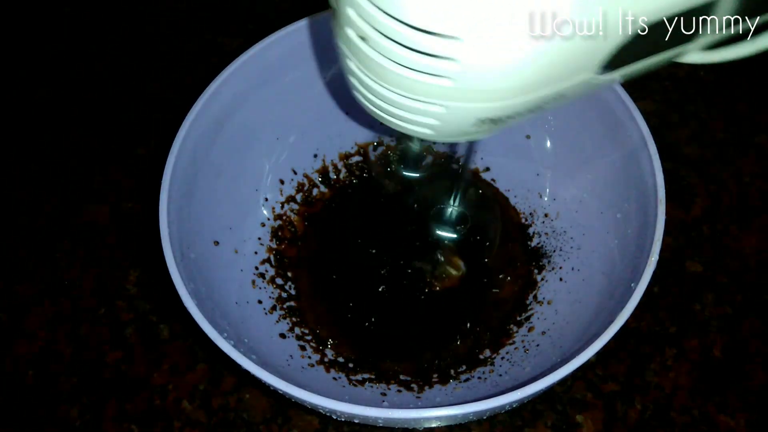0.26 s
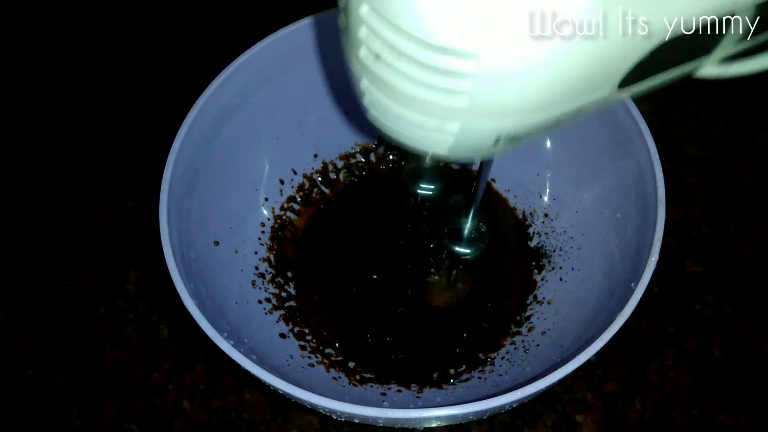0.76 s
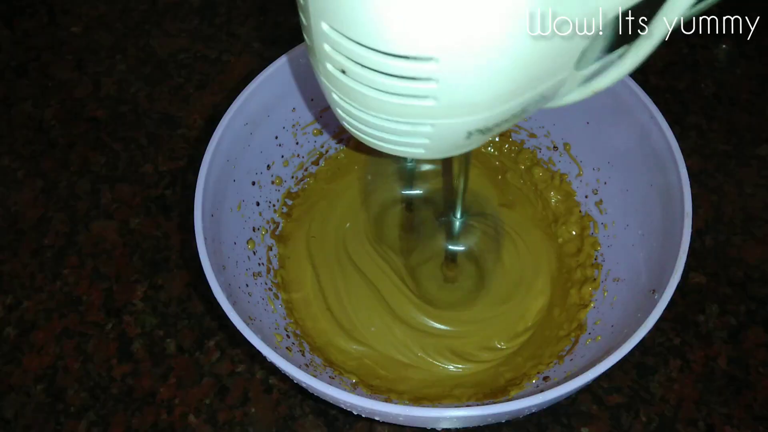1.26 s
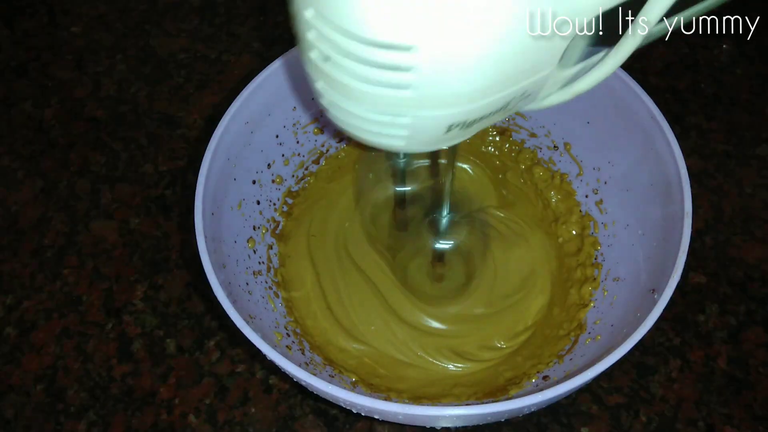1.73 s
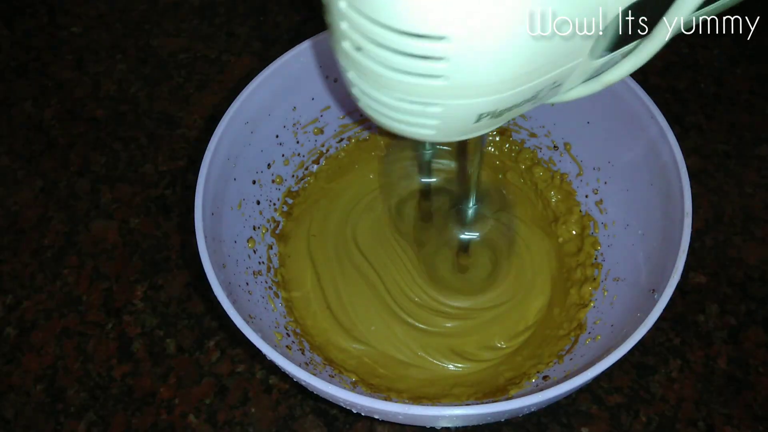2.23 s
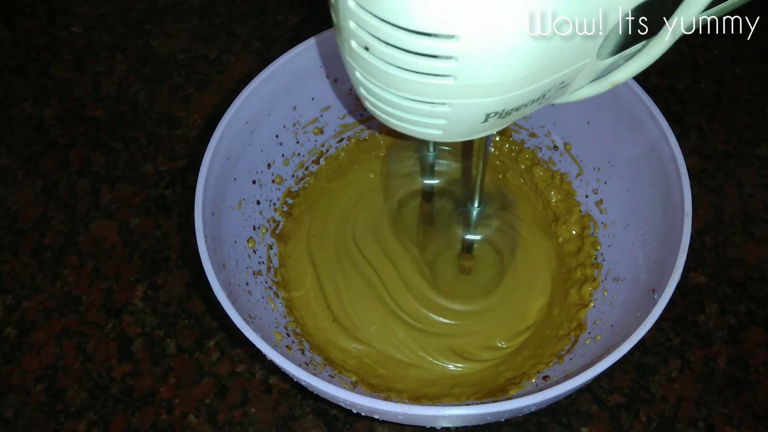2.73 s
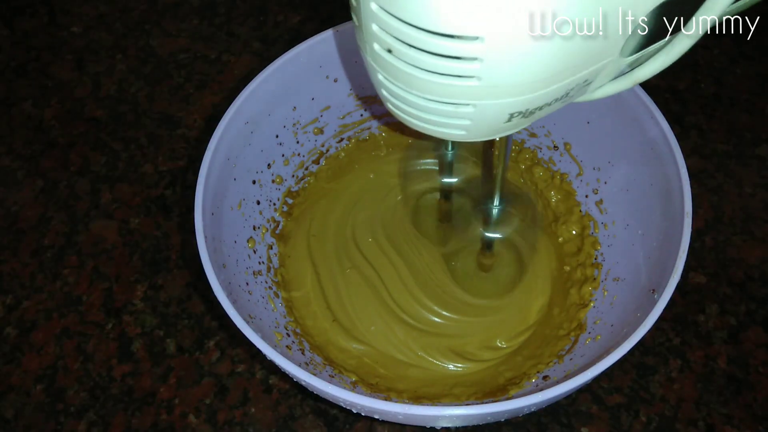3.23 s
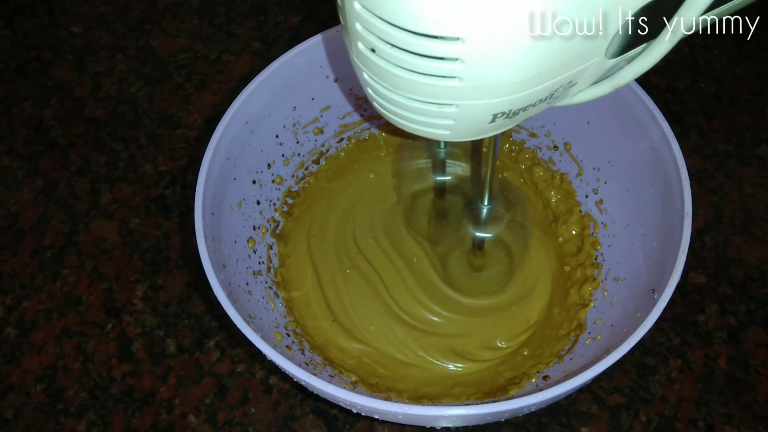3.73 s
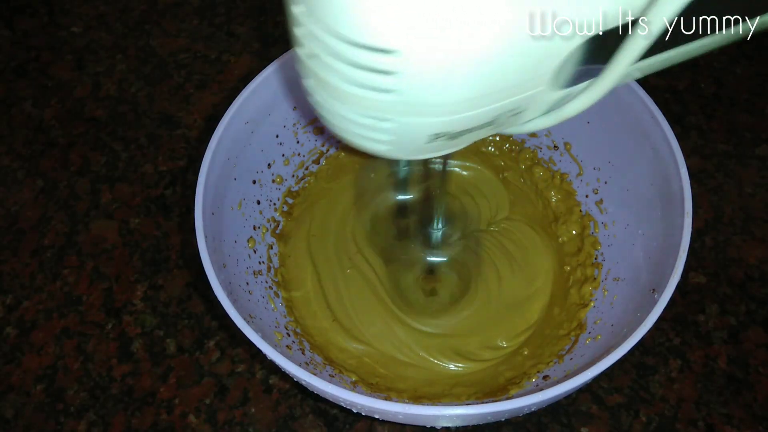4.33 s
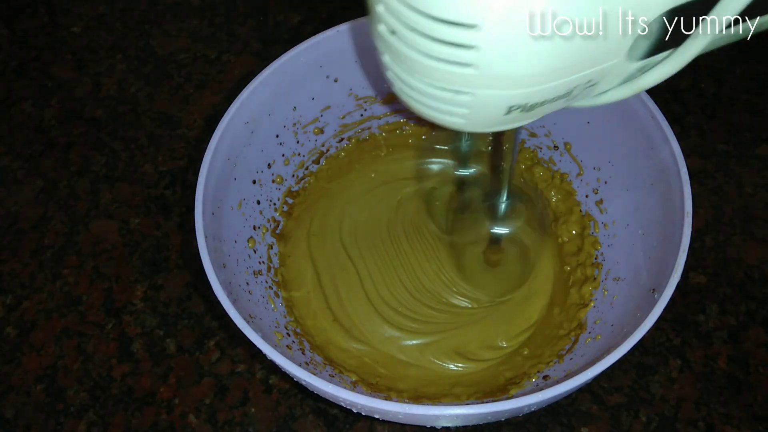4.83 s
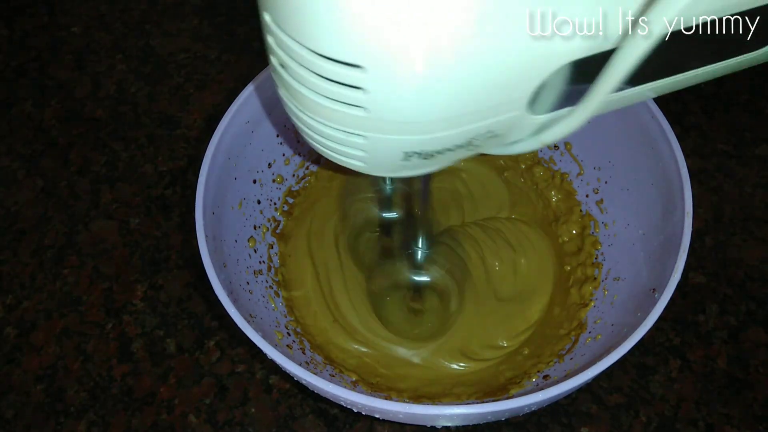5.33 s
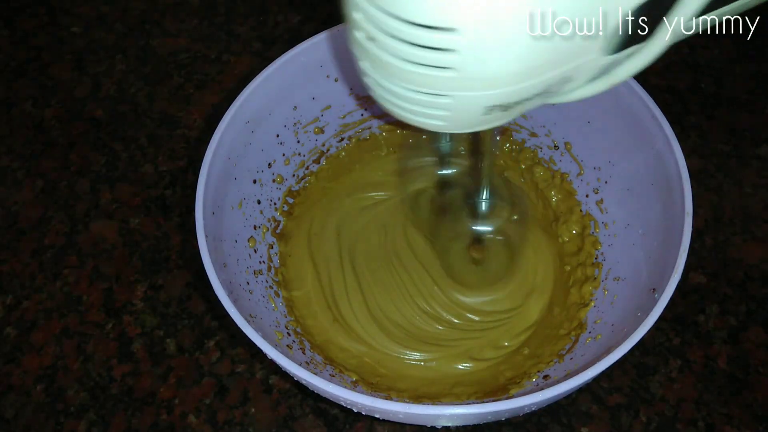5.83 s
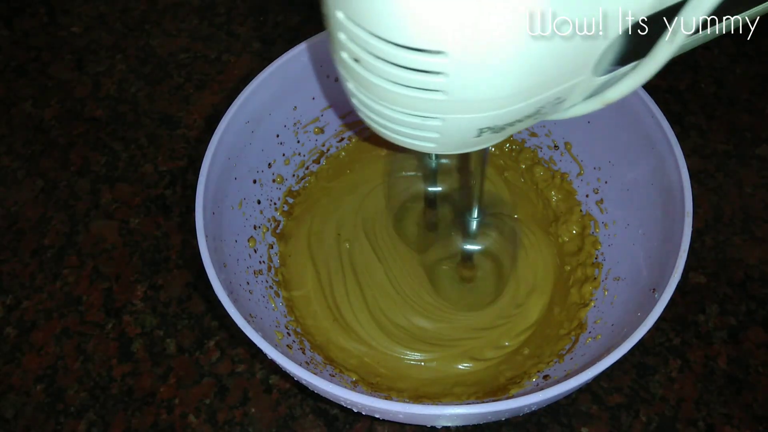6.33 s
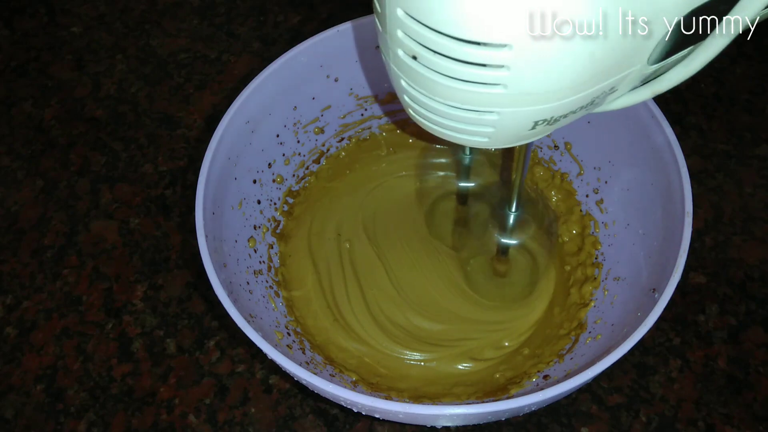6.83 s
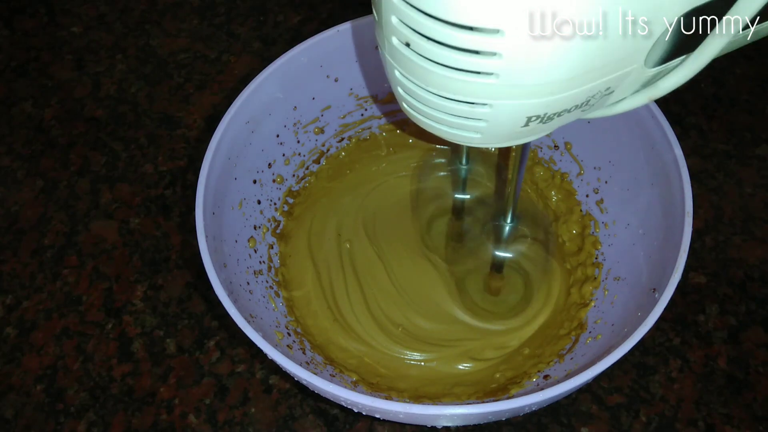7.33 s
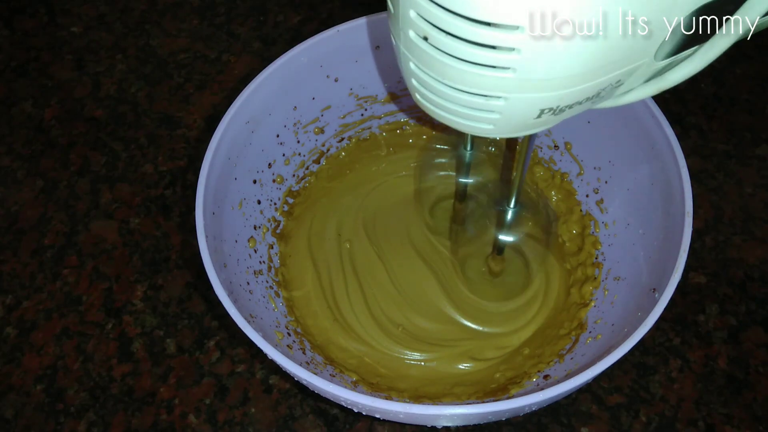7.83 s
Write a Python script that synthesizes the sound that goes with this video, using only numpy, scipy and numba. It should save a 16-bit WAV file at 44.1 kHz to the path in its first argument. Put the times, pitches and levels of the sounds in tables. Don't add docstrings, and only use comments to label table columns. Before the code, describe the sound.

A hand mixer is heard near the microphone. First a slow, rough whir with busy, uneven plastic knocks and wire ticks, cut off sharply. After a brief near silence, a smoother, brighter full-speed whine swells in, with airy hiss and soft churning in thick foam, wavering slightly. Finally a soft switch thud; the motor drops in pitch and flutters as room hush rises.

```python
import sys
import numpy as np
from scipy import signal
from scipy.fft import rfft, irfft, next_fast_len
from scipy.io import wavfile
from scipy.ndimage import uniform_filter1d
from numba import njit

SR = 44100
rng = np.random.default_rng(int(sys.argv[2]) if len(sys.argv) > 2 else 0)


def makeup_ratio(level_db):
    decades = np.asarray(level_db, float) / 20
    return 10 ** decades


def generate_wav(sig):
    pcm = np.round(np.clip(np.atleast_2d(sig).T, -1, 1) * 32767).astype(np.int16)
    wavfile.write(sys.argv[1], SR, pcm)


N = 355870
TIME = np.arange(N) / SR

# start_s, shaft_hz, lean (-2..2), twist (-2..2)
SLOW_RUN = [
    (0, 271.7, 0.05, -0.65),
    (.2, 272.1, -0.02, 0.97),
    (.6, 273.4, 0.15, -0.13),
    (.8, 274, 0.18, 0.24),
    (1.0, 275.5, -0.88, -1),
    (1.06, 274.7, 0.97, 1),
    (1.12, 277.7, 0.89, 0.5),
]
FAST_RUN = [(1.5, 429, -1.7, -0.9), (2.0, 429, -0.21, 2), (2.3, 428, -1.2, -2), (2.7, 428.8, -1.1, -2),
            (3.1, 429.2, -1.7, -2), (3.6, 430.3, -0.11, -1.1), (4.0, 428.6, -1.18, -2),
            (4.33, 430.6, -1.1, -1.5), (4.5, 428.5, 0.24, 0.5), (4.9, 426.4, 0.56, -1.8),
            (5.4, 428, 1.7, 0.5), (5.7, 427, 0.95, -0.5), (6.0, 424.8, 1.7, -1), (6.4, 427.3, -1, -0.5),
            (6.88, 429.7, -1, -1.3), (7.1, 423.4, 0.5, -1), (7.22, 417.5, 0.54, -1), (7.32, 412, 0.96, 0.3)]
# shaft_multiple, left_db, right_db, left_lead_rad, gear_wobble_depth (0-1)
SLOW_TONES = [(1.004, 3, 0, -0.5, 0), (5.94, -7.5, 1, -0.5, 0.8), (7.22, 0, -6, -4.5, 0.2),
              (2.85, 1.5, -2, -2.5, 0.15), (8.04, -9, 0.5, -1.5, 0.1), (11.5, -2.5, -12, 1.3, 0.7),
              (16, -20, -11, 0, 0.6), (24, -20, -9, 5.5, 0.5), (15, -16, -15, -0.5, .5),
              (17, -17, -11, 2, .5), (20, -16, -20, 1.5, .5), (35.5, -20, -2, -1, 1.2),
              (38, -24, -21, -7, .2)]
FAST_TONES = [(1.0008, 4, -4, 0.28, 0.21), (3, -4.5, 4, 1, 0.46), (4, 1.5, -3, 1, 0.47),
              (1.994, 1.5, 4, -2, 0.24), (7.008, 5, -1, 0.5, 0.47), (5.015, 5, -2, 1, 0.36),
              (8, 1, 0.5, 2, 0.34), (5.974, -13.5, -13.5, 0, 0.14), (9, -15.5, -15.5, 6, 0.23),
              (10, -23, -17, 2.5, 0.18), (13, -24, -24, 1.5, .2), (16, -16, -18, 2, 0.22),
              (11.1, -16.5, -23, 1, 0.17), (12, -12, -11, 2, 0.23), (13.9, -16, -15, 1.5, 0.25),
              (18.2, -9, -14, 1.5, 0.34), (24, -14, -6, 4.5, 0.22)]
# level_db, per_lean_db, per_twist_db, coasting_loss_db
SLOW_PARTS = [
    (-50.5, 3, -1, -3),
    (-52.5, 10, -8.5, -1),
    (-52.5, 2.5, 1, -1),
    (-51, 1.5, 1, -2),
    (-54, 0, 4, 1),
]
FAST_PARTS = [
    (-43, 0.07, -0.063, 39),
    (-53.5, 0.2, 0.077, 5),
    (-43.5, -0.5, 0, 10.8),
    (-42.5, 1, -1.2, 27),
    (-45.5, 1, -0.34, 35),
    (-41.5, -1.6, 0.21, 32),
    (-55, 3, -0.086, 21),
    (-52, -2.5, 0, 40),
    (-52, 0.5, 1.5, 23),
    (-52, 4, -2.3, 11),
]
# start_s, roll (-2..2)
WRIST_ROLL = [(1.2, 0.29), (2.0, 0.38), (2.8, -0.52), (3.6, -0.64), (4.3, -0.93), (4.8, 0.022),
              (5.12, -0.49), (5.5, -0.61), (5.85, -0.16), (6.3, -0.31), (6.8, -1.2), (7.1, -0.095),
              (7.4, 1.5)]
PART_ROLL_DB = [0.15, 0.1, 0.1, 0.092, 2.4, 0.069, 0.1, 0.1, 0.1, 0.1]
# pitch_hz, width_hz, lift_db
HOUSING_MODES = [(361, 16.6, 4.5), (418.3, 5.3, -13.5), (833, 12.6, 8.5), (1259.5, 13.5, 6.5),
                 (1550, 37, 6), (1679, 16, 5), (1904, 33, 13), (2265, 53, 5), (2600, 108, 15.5),
                 (2770, 21, 6.5), (2945, 47, -6.5), (3170, 18, 9)]
# centre_s, dip_db, half_length_s
FOAM_CATCHES = [(7.173, 1, 0.026), (7.388, -11, 0.018), (7.445, -12, 0.0088), (7.49, -14, 0.011),
                (7.569, -13, 0.011), (7.614, -12.5, 0.0089), (7.702, -6, 0.015), (7.769, -6, 0.02),
                (7.809, -6, 0.011), (7.927, -4, 0.011), (8.04, -14, 0.015)]
# frequency_hz, density_db (per Hz)
SLOW_AIR = [(18, -76), (45, -49), (90, -31), (221, -21), (273, -9), (336, -6.5), (461, -10), (569, -9),
            (1160, -16.5), (1670, -12), (2900, -15.5), (3980, -25), (8300, -28.5), (10800, -18.5),
            (16000, -31.5)]
FAST_AIR = [(18, -46), (40, -27), (70, -23.5), (140, -29), (364, -10.5), (1010, -14.5), (1720, -10.5),
            (2300, -12.5), (3450, -11), (3950, -25.5), (7000, -23), (8300, -23), (9500, -12.5),
            (11100, -10.5), (13300, -17), (14000, -23), (15000, -20), (16000, -19.5)]
# frequency_hz, density_db (per Hz)
RATTLE_SPECTRUM = [(300, -46), (1000, -4), (1800, -1), (3500, -1.5), (4500, -1), (6000, -3), (8000, -1.5),
                   (11000, -3.5), (13500, -7), (16000, -8)]
# pitch_hz, level_db, t60_s
BOWL_MODES = [(198.5, -6, 0.09), (363, -5.5, 0.069), (500, -6, 0.15), (580, -1.5, 0.2), (730, 3, 0.028),
              (852, 1.5, 0.046), (1000, -0.5, 0.03)]
WIRE_MODES = [(1880, -8, 0.019), (2260, -2, 0.02), (2930, 2.5, 0.027), (3300, -20, 0.026),
              (4820, -6.5, 0.058), (7560, -23, 0.015), (10900, 3, 0.011)]
# start_s, peak_db, spot_pitch_hz
KNOCKS = [(0.012, -32, 715), (0.063, -32, 685), (0.074, -38, 547), (0.198, -33.5, 760), (0.256, -45, 690),
          (0.488, -37, 700), (0.189, -36, 855), (0.213, -33, 1000), (0.225, -31, 810), (0.246, -29.5, 750),
          (0.331, -29, 760), (0.404, -27, 744), (0.428, -27.5, 735), (0.448, -30, 466), (0.474, -29.5, 460),
          (0.594, -24.5, 720), (0.605, -32, 540), (0.679, -29, 495), (0.71, -27, 564), (0.736, -32, 471),
          (0.84, -29, 554), (0.866, -31, 570), (0.939, -32, 753.5), (1.036, -32, 766), (1.038, -30, 654),
          (1.052, -28, 700), (1.059, -31, 500), (1.096, -32, 510), (1.107, -36, 610), (1.101, -37, 710),
          (1.116, -30.5, 903), (1.179, -24.5, 631), (0.585, -31, 490), (0.045, -33, 520), (0.155, -44, 525),
          (0.336, -35, 720), (0.409, -36, 700), (0.465, -35, 614), (0.523, -36, 620), (0.108, -41, 560),
          (0.536, -41, 500), (0.689, -30, 604), (0.804, -37, 880), (0.845, -34, 530), (0.768, -37, 500),
          (1.040, -34, 500), (1.127, -36, 604), (1.136, -37, 587), (7.311, -37, 571.5), (7.409, -42, 595),
          (7.5, -46, 580), (7.63, -40, 580), (7.71, -45, 568)]
# start_s, ring_db, wire_pitch_hz
CLINKS = [(0.061, -48, 2130), (0.085, -41, 2200), (0.463, -41, 1890), (0.796, -43, 1588),
          (0.225, -41, 2130), (0.245, -38, 1800), (0.404, -38, 2230), (0.428, -41, 2060),
          (0.473, -36, 2330), (0.592, -41, 2600), (0.605, -38, 2200), (0.680, -34.5, 1760),
          (0.711, -40, 1730), (0.762, -40, 2600), (0.84, -45, 2070), (1.035, -28.5, 2430),
          (1.038, -31, 2600), (1.053, -30.5, 1890), (1.055, -37, 2200), (1.062, -42, 2200),
          (1.095, -36, 2170), (1.117, -47, 2130), (1.178, -38, 2194), (1.058, -38, 5600),
          (1.066, -42, 4900), (0.689, -40, 1700), (0.805, -40, 1700), (0.729, -39, 2200),
          (1.103, -40, 2000), (1.136, -47, 2100)]
# frequency_hz, density_db (per Hz)
CRACK_SPECTRUM = [(300, -19), (2500, 6.5), (5500, -2), (7000, -8), (11000, -4), (13000, -7), (16000, -6.5)]
# start_s, level_db, decay_s
BUMPS = [
    (0.98, -66, 0.05),
    (1.036, -58, 0.05),
    (0.46, -61, 0.06),
    (7.4, -69, 0.05),
    (7.9, -72, 0.061),
]
# frequency_hz, density_db (per Hz)
KITCHEN_SPECTRUM = [(18, -43), (100, -35), (260, -11), (890, -16), (1600, -11), (3000, -20), (4200, -19.5),
                    (6500, -23.5), (11000, -49), (14000, -28), (16000, -25.5)]
# start_s, level_db
KITCHEN_LEVEL = [
    (0, -63),
    (1.19, -59),
    (1.3, -67.5),
    (7.3, -50.5),
    (7.6, -47),
    (7.85, -49),
    (8.07, -50.5),
]
# pitch_hz, level_db, t60_s
HOLLOW_MODES = [(588, 0.5, 0.044), (766, -10.5, 0.1), (1620, 2, 0.08), (1750, -2, 0.08), (2230, 2, 0.072),
                (2470, -4, 0.074)]
# frequency_hz, common_share (0-1)
PORT_LIKENESS = [(30, .15), (70, 0.29), (140, 0.61), (350, 0.85), (700, 0.18), (2500, 0.42), (8000, 0.21),
                 (16000, 0.26)]
# frequency_hz, left_minus_right_db
PORT_TILT = [(30, -3), (300, 3.5), (2500, -0.5), (5000, -2.5), (9000, -2.5), (14000, -1)]

GEAR_RATIO = 21.45
SWITCH_OFF_S = 7.32
COAST_S, UNLOCK = 1.5, 0.2
CUT_S, FADE_FROM_S, FADE_TO_S = 1.188, 1.2676, 1.495
PORT_LAG_S, LAG_TOP_TURNS = 5 / SR, 1.19
PORTS_APART_HZ = 720


def mixer(run, parts, tones, air, wobbles, air_db, rattle_db, feedback, slosh_db, sputter_db, bursts_db):
    hz, (fan_db, bowl_db, other_db, *leading_dbs) = handling(run, parts, tones)
    whine = housing(hz, tones, leading_dbs + [other_db], wobbles, wander_db=2.0, quiver=0.41, dulling_db=3.0)
    turns = np.cumsum(hz) / SR
    beat = makeup_ratio(0.63 * np.cos(2 * np.pi * wobbles * turns / GEAR_RATIO) + 1.3 * walk(24.99))

    wind = patchy(ports(rng.standard_normal((3, N)), air), depth_db=2.5, wide_hz=259, long_s=0.07)
    gusts_db = 1.1 * walk(12) + 0.55 * walk(3.9) + 0.94 * np.cos(2 * np.pi * turns)
    wind *= makeup_ratio(fan_db + air_db + gusts_db)

    repeat = feedback * (hz / hz.max()) ** 4
    clatter = [once_a_turn(once_a_turn(x, hz, repeat), hz, repeat) for x in rng.standard_normal((3, N))]
    rattle = ports(np.array(clatter), RATTLE_SPECTRUM) * beat
    rattle *= makeup_ratio(fan_db + rattle_db + 0.49 * walk(3.58))

    slaps = rng.standard_normal(N) * (rng.random(N) < .02) * beat * makeup_ratio(bursts_db * walk(70))
    slosh = level(ring(slaps, BOWL_MODES, spread=1.0), 0) * makeup_ratio(bowl_db + slosh_db)
    ticks = rng.standard_normal(N) * (rng.random(N) < .003) * makeup_ratio(5 * walk(19))
    sputter = level(ring(ticks, WIRE_MODES, spread=1.7), 0) * makeup_ratio(bowl_db + sputter_db)
    return whine + wind + rattle + slosh + sputter


def handling(run, parts, tones):
    s, *columns = np.transpose(run)
    hz, lean, twist = (np.interp(TIME, s, c) for c in columns)
    hz = hz * np.exp(-np.maximum(TIME - SWITCH_OFF_S, 0) / COAST_S)
    slowing = np.log(hz.max() / hz)
    unlocked = 1 - np.exp(-(slowing / UNLOCK) ** 3) + 3 * slowing ** 2
    roll = np.interp(TIME, *np.transpose(WRIST_ROLL))
    dbs = []
    for row, (db, per_lean, per_twist, lost) in enumerate(parts):
        loss = slowing if row in (0, 2, 3) else unlocked
        dbs.append(db + per_lean * lean + per_twist * twist - lost * loss + PART_ROLL_DB[row] * roll)
    for db, (order, *_) in zip(dbs[3:], tones):
        for at_hz, width, lift_db in HOUSING_MODES:
            db += lift_db / (1 + ((round(order) * hz - at_hz) / width) ** 2)
    return hz, dbs


def housing(hz, tones, tone_dbs, wobbles, wander_db, quiver, dulling_db):
    out, turns = 0, np.cumsum(hz) / SR
    slowing = np.log(hz.max() / hz)
    choke_db = sum(db * np.exp(-((TIME - s) / half) ** 2) for s, db, half in FOAM_CATCHES)
    for row, (order, left_db, right_db, lead, depth) in enumerate(tones):
        free = row >= len(tone_dbs) - 1
        upper = row > 0
        unsteady = quiver * (1 + 0.07 * free * order + 9 * slowing * upper)
        gear = 2 * np.pi * (wobbles * turns / GEAR_RATIO + rng.random())
        swing = 1 + 0.56 * depth * np.cos(gear)
        drift_db = wander_db * free * walk(2.53) + (wander_db / 2 + 8 * slowing * upper) * walk(30)
        drift_db = drift_db + (not upper) * choke_db + 22 * np.minimum(slowing, .2) * upper * walk(18)
        drift_db = drift_db - dulling_db * free * order * slowing
        phase = 2 * np.pi * round(order) * turns + 0.8
        phase = phase + depth * np.cos(gear + 1.3 * (4 - round(order))) + unsteady * walk(40)
        left = makeup_ratio(left_db) * np.cos(phase + lead / 2)
        right = makeup_ratio(right_db) * np.cos(phase - lead / 2)
        tone_db = tone_dbs[-1 if free else row] + drift_db
        out = out + np.sqrt(2) * makeup_ratio(tone_db) * swing * np.array([left, right])
    return out


def patchy(x, depth_db, wide_hz, long_s):
    hz, _, cells = signal.stft(x, SR, nperseg=512)
    chance = rng.standard_normal(cells.shape[1:])
    for reach, axis in ((wide_hz * 512 / SR, 0), (long_s * SR / 256, 1)):
        size = max(int(reach), 1)
        chance = uniform_filter1d(uniform_filter1d(chance, size, axis), size, axis)
    depth_db = depth_db * np.clip(hz / 3200, 0, 1)[:, None] ** 2
    cells = cells * makeup_ratio(depth_db * chance / chance.std())
    return level(signal.istft(cells, SR, nperseg=512)[1][:, :N], 0)


@njit
def once_a_turn(x, hz, feedback):
    y = np.zeros(len(x))
    for i in range(len(x)):
        place = i - SR / hz[i]
        j = int(place)
        past = y[j] + (place - j) * (y[j + 1] - y[j]) if place > 0 else 0.
        y[i] = x[i] + feedback[i] * past
    return y


def ring(push, modes, spread):
    t = TIME[:SR // 5]
    apart = np.minimum(np.array(modes)[:, :1, None] / PORTS_APART_HZ, 1) ** 2
    turn = spread * rng.standard_normal((len(modes), 2, 1)) * apart
    response = 0
    for (hz, db, t60), angle in zip(modes, turn):
        response = response + makeup_ratio(db - 60 * t / t60) * np.sin(2 * np.pi * hz * t + angle)
    response = signal.sosfilt(signal.butter(2, 205, "high", fs=SR, output="sos"), response)
    return signal.fftconvolve(push[None], response, axes=1)[:, :N]


def knocks(spot_db, spot_t60, wire_db, wire_t60, bowl_db, whisk_db, crack_db, scatter_s):
    (s, peak_db, _), (clink_s, ring_db, _) = np.transpose(KNOCKS), np.transpose(CLINKS)
    dull, bright = np.zeros((2, N))
    dull[(s * SR).astype(int)] = makeup_ratio(peak_db + bowl_db)
    bright[(clink_s * SR).astype(int)] = makeup_ratio(ring_db)
    scrape = np.exp(-TIME[:600] / scatter_s)
    dull, bright = (signal.fftconvolve(x, scrape)[:N] for x in (dull, bright))
    grit = np.sign(rng.standard_normal((4, N)))
    out = ring(dull * grit[0], BOWL_MODES, spread=0.84)
    out += makeup_ratio(whisk_db) * ring(bright * grit[1], WIRE_MODES, spread=0.96)
    splash = signal.lfilter([.004], [1, -np.exp(-1 / (0.0094 * SR))], bright)
    crack = (bright + splash) * grit[2:]
    out += makeup_ratio(crack_db) * ports(np.vstack([crack[:1], crack]), CRACK_SPECTRUM) * np.std(crack)

    t = TIME[:SR // 12]
    late = t - np.array([[PORT_LAG_S], [0]])
    onset = np.minimum(t / 0.0016, 1)
    for start, db, hz in KNOCKS:
        spot = makeup_ratio(db + spot_db - 60 * t / spot_t60) * np.sin(2 * np.pi * hz * late) * onset
        out[:, int(start * SR):][:, :len(t)] += spot
    for start, db, hz in CLINKS:
        wire = makeup_ratio(db + wire_db - 60 * t / wire_t60) * np.sin(2 * np.pi * hz * late)
        out[:, int(start * SR):][:, :len(t)] += wire
    return out


def switch():
    since = np.maximum(TIME - SWITCH_OFF_S, 0)
    thud = uniform_filter1d(rng.standard_normal((2, N)), size=24, axis=1)
    return makeup_ratio(-31) * (since > 0) * np.exp(-since / 0.0081) * thud


def counter():
    band = signal.butter(2, [45, 110], "band", fs=SR, output="sos")
    rumble = signal.sosfilt(band, rng.standard_normal((2, N)))
    shape = sum(makeup_ratio(db) * (TIME > s) * np.exp(-np.maximum(TIME - s, 0) / decay) for s, db, decay in BUMPS)
    return level(0.3 * rumble[0] + rumble, 0) * shape


def mains_hum():
    return makeup_ratio(-58.5) * np.sin(2 * np.pi * 200 * TIME) + makeup_ratio(-71.5) * np.sin(2 * np.pi * 100 * TIME)


def kitchen():
    hush = ports(rng.standard_normal((3, N)), KITCHEN_SPECTRUM)
    drive = rng.standard_normal(N) * makeup_ratio(2.3 * walk(8.1))
    hollows = level(ring(drive, HOLLOW_MODES, spread=0.79), -4.5)
    return makeup_ratio(np.interp(TIME, *np.transpose(KITCHEN_LEVEL))) * (hush + hollows)


def ports(sources, spectrum):
    size = next_fast_len(N)
    shared, left, right = rfft(sources, size) * makeup_ratio(along(spectrum))
    like = np.clip(along(PORT_LIKENESS), 0, 1)
    lag_turns = np.minimum(np.fft.rfftfreq(size, 1 / SR) * PORT_LAG_S, LAG_TOP_TURNS)
    late = np.exp(-2j * np.pi * lag_turns)
    pair = np.sqrt(like) * shared * np.array([late, np.ones_like(late)])
    pair = pair + np.sqrt(1 - like) * np.array([left, right])
    pair *= makeup_ratio(np.outer([.5, -.5], along(PORT_TILT)))
    return level(irfft(pair, size)[:, :N], 0)


def level(x, db):
    return x * makeup_ratio(db) / np.sqrt(np.mean(x ** 2))


def along(table):
    hz, value = np.transpose(table)
    bins_hz = np.fft.rfftfreq(next_fast_len(N), 1 / SR)
    return np.interp(np.log(bins_hz + 1), np.log(hz), value)


def walk(rate):
    k = int(SR / rate)
    held = np.repeat(rng.standard_normal(N // k + 1), k)
    return 0.67 * uniform_filter1d(uniform_filter1d(held, k), k)[:N]


def scene():
    slow = mixer(SLOW_RUN, SLOW_PARTS, SLOW_TONES, SLOW_AIR, wobbles=2.4, air_db=10, rattle_db=0.0,
                 feedback=0.5, slosh_db=-1.5, sputter_db=-4.5, bursts_db=9)
    fast = mixer(FAST_RUN, FAST_PARTS, FAST_TONES, FAST_AIR, wobbles=0.96, air_db=5.5, rattle_db=2.0,
                 feedback=0.51, slosh_db=2.5, sputter_db=-2, bursts_db=2.5)
    struck = knocks(spot_db=-4.0, spot_t60=0.046, wire_db=5.0, wire_t60=0.03, bowl_db=-27.5,
                    whisk_db=-23.5, crack_db=1.5, scatter_s=0.0012)
    running = np.where(TIME < CUT_S, slow + mains_hum(), fast)
    return running + struck + switch() + counter() + kitchen()


def roll_off(x):
    return signal.sosfilt(signal.butter(12, 15760, fs=SR, output="sos"), x)


def record(dry):
    dull = signal.sosfilt(signal.ellip(12, .2, 90, 15720, fs=SR, output="sos"), dry)
    fade = np.clip((TIME - FADE_FROM_S) / (FADE_TO_S - FADE_FROM_S), 0, 1)
    stop = np.clip((CUT_S + 0.0013 - TIME) / 0.002, 0, 1)
    mix = dull * np.where(TIME < CUT_S, stop, fade * 0.91 + 0.1 * (fade > 0))
    return roll_off(mix)


dry = scene()
out = record(dry)
generate_wav(out)
```